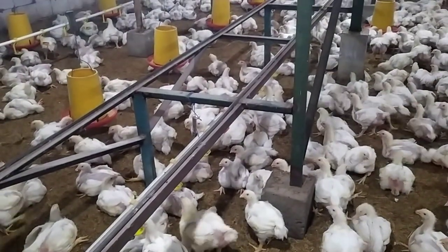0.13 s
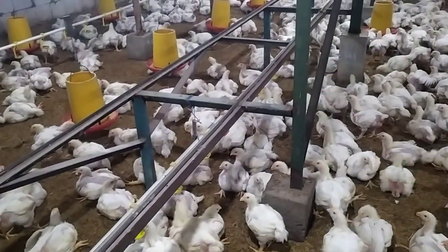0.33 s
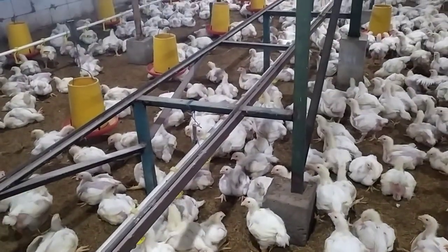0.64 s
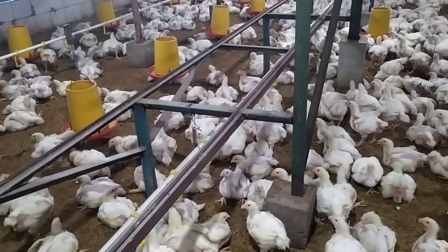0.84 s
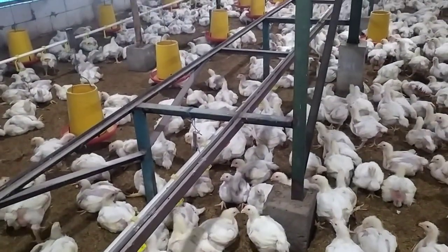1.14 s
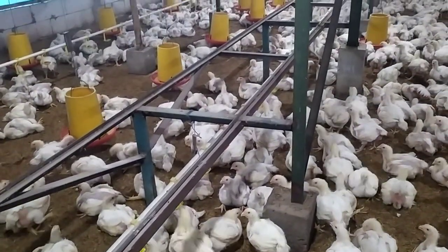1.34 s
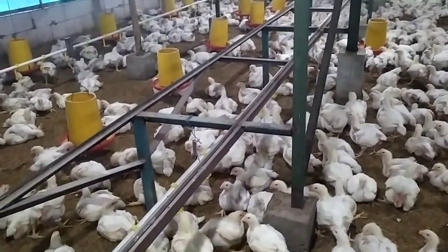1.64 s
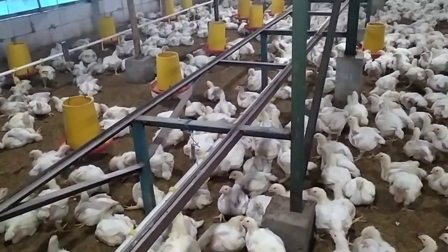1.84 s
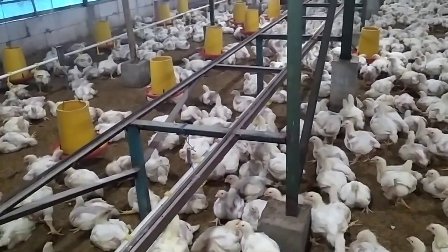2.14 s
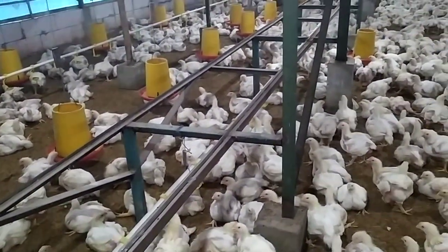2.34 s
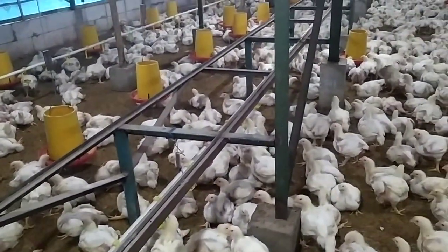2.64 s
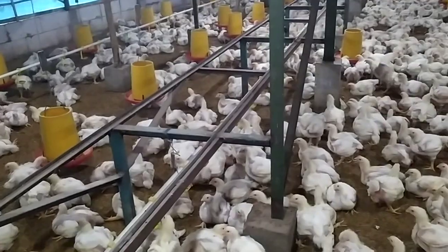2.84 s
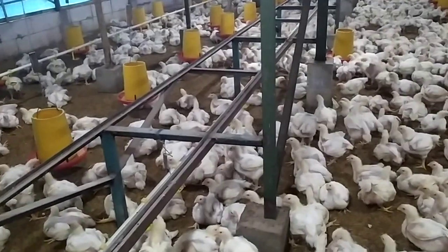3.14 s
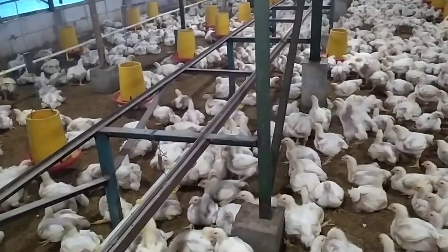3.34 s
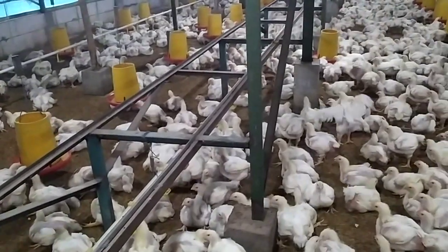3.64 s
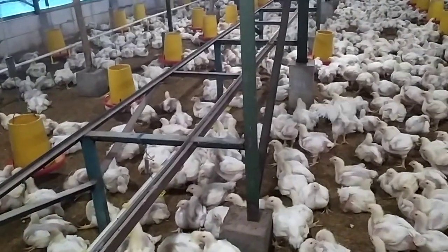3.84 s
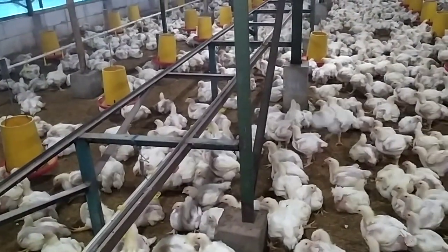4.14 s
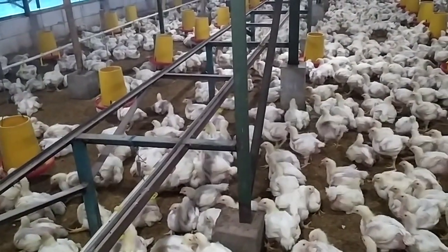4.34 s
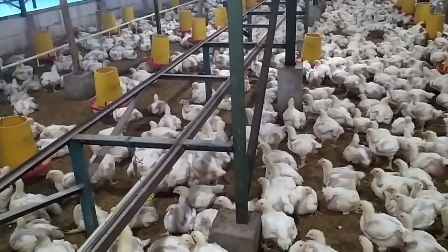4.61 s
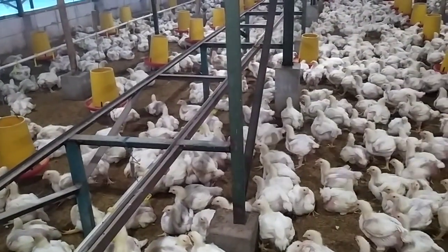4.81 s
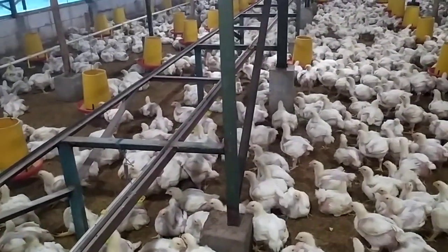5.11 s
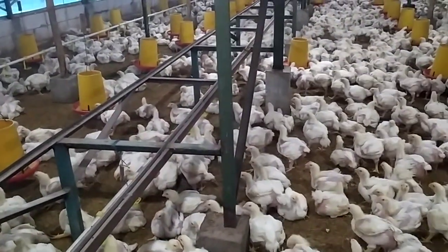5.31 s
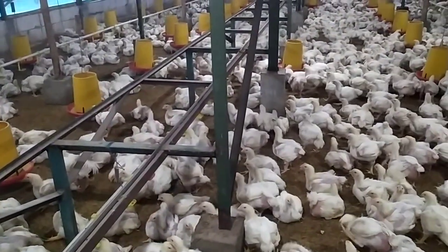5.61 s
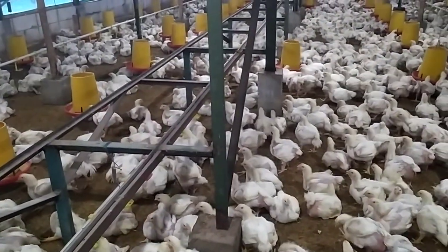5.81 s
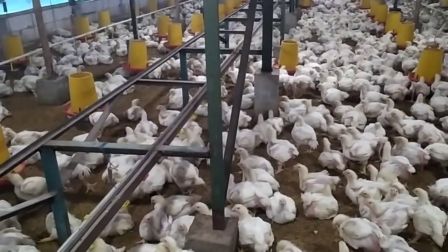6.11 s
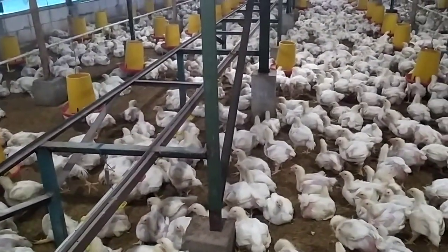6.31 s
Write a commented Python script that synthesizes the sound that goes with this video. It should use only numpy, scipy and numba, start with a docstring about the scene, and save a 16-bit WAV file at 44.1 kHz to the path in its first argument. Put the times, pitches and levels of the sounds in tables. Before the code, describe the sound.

Low fans hum steadily under a dense wash of peeping from hundreds of young chickens in a barn with a short echo. Closer to the microphone, single birds chirp in quick, sometimes raspy whistles and cluck hoarsely. Dry litter crackles all along, mixed with claw scratches, feather rustles, dull footfalls and scattered pecks. One short, strained squeal rises from the flock shortly before the end.

```python
"""A big flock of young broiler chickens in a closed barn, heard from above.
From the start, fans throb low and hundreds of syrinxes blur into a chorus over crackling litter.
Near birds peep in short, mostly falling whistles and cluck hoarsely through ringing throats; all along,
feet thud and scratch, feathers rustle and beaks tap. Near the end, at 5.7 s, one bird squeals."""
import sys
import numpy as np
from scipy import signal
from scipy.fft import rfft, irfft, next_fast_len
from scipy.io import wavfile
from scipy.ndimage import uniform_filter1d
from numba import njit

SR = 44100
rng = np.random.default_rng(int(sys.argv[2]) if len(sys.argv) > 2 else 0)


def transcribe(signal):
    """Save signal, clipped to [-1, 1], as a 16-bit WAV file at the path in sys.argv[1]."""
    frames = np.atleast_2d(signal).T
    limited = np.clip(frames, -1, 1)
    pcm = np.round(limited * 32767).astype(np.int16)
    wavfile.write(sys.argv[1], SR, pcm)


N = 284886
TIME = np.arange(N) / SR


def undb(db):
    """Decibels to gain."""
    return 10 ** (np.asarray(db) / 20)


def unit(x):
    """Scale to rms 1."""
    return x / np.sqrt(np.mean(x ** 2) + 1e-20)


def curve(rows):
    """An automation line through (t/s, value) breakpoints."""
    return np.interp(TIME, *np.transpose(rows))


def walk(rate, size=N):
    """Smooth random modulation with a spread near 1 that turns rate times a second."""
    hold = max(int(SR / rate), 2)
    held = np.repeat(rng.standard_normal(size // hold + 2), hold)
    return 1.26 * uniform_filter1d(uniform_filter1d(held, hold), hold)[:size]


def colour(x, points):
    """EQ a sound through (f/Hz, gain/dB) points, then scale to rms 1."""
    hz, db = np.transpose(points)
    size = next_fast_len(N + SR // 8, True)
    bins_hz = np.maximum(np.fft.rfftfreq(size, 1 / SR), 1)
    gain = undb(np.interp(np.log(bins_hz), np.log(hz), db))
    return unit(irfft(rfft(x, size) * gain, size)[..., :N])


def resonate(x, hz, width_hz):
    """A resonance with gentle skirts."""
    edges = np.clip([hz - width_hz / 2, hz + width_hz / 2], 30, SR / 2 - 100)
    return signal.lfilter(*signal.butter(2, edges, "band", fs=SR), x)


def stereo_noise(side_db, size=N):
    """Mid/side noise; side_db sets the width."""
    mid, side = rng.standard_normal((2, size))
    return unit(mid + undb(side_db) * side * np.array([[1], [-1]]))


def panned(pan_db):
    """Channel gains for a pan, which is always left minus right in dB."""
    return undb(np.array([[pan_db], [-pan_db]]) / 2)


def add(out, sound, s, pan_db=0):
    """Place a sound at time s; it reaches the louder side a little earlier."""
    lag = int(8 * np.tanh(pan_db / 3))
    for channel, side in enumerate((1, -1)):
        start = max(int(s * SR) - side * lag, 0)
        part = np.broadcast_to(sound, (2, sound.shape[-1]))[channel, :max(N - start, 0)]
        out[channel, start:start + len(part)] += part * undb(side * pan_db / 2)


def barn(x, early_db=4.5, early_s=0.014, t60_s=0.39, treble_t60_s=0.27):
    """Early reflections off floor and rails, then the tail of walls and roof; the treble dies first."""
    t = np.arange(SR // 2) / SR
    noise = rng.standard_normal((2, len(t)))
    low = signal.lfilter(*signal.butter(2, 3500, fs=SR), noise)
    tail = low * undb(-60 * t / t60_s) + (noise - low) * undb(-60 * t / treble_t60_s)
    response = tail * (1 + undb(early_db) * np.exp(-t / early_s)) * (t > .003)
    return signal.fftconvolve(x, unit(response) / np.sqrt(len(t)), axes=1)[:, :N]


def bounced(call, bounce_db=-4.5, decay_s=0.0083):
    """Short paths via floor, rails and feeders break a call up at each ear but keep its energy."""
    t = np.arange(SR // 30) / SR
    scatter = unit(rng.standard_normal((2, len(t))) * np.exp(-t / decay_s))
    paths = scatter * undb(bounce_db) / np.sqrt(len(t))
    paths[:, 0] = 1  # the direct path
    heard = signal.fftconvolve(call[None], paths, axes=1)
    return heard * np.sqrt(np.sum(call ** 2) / np.sum(heard ** 2, axis=1, keepdims=True))


def fan_tone(hz, drift_hz=0.715):
    """The hum of a fan or motor, wavering in pitch and slightly different at each ear."""
    phase = 2 * np.pi * (rng.random() + np.cumsum(hz + drift_hz * walk(7)) / SR)
    return np.sqrt(2) * np.sin(phase + 0.16 * walk(11) * np.array([[1], [-1]]))


def ventilation(fan_hz=84.63, flutter_db=0.6):
    """The low bed: a throbbing fan tone, weaker hums and the rumble of moving air."""
    # slow throb of the main fan tone: t/s, level/dB
    throb = [(0.0, -41), (0.07, -35.5), (0.7, -45), (0.77, -35), (1.2, -40), (1.58, -35.5), (1.71, -57),
             (1.96, -30.5), (2.19, -57), (2.28, -36), (2.59, -45), (2.91, -33), (3.18, -52.5), (3.27, -33),
             (3.54, -45.5), (3.89, -39), (4.08, -54.5), (4.77, -32.5), (4.82, -44), (5.29, -33),
             (5.34, -41), (5.76, -35), (6.1, -48.5), (6.46, -38.5)]
    # weaker fan and motor tones: f/Hz, level/dB
    hums = [(43, -57), (60.3, -52.5), (70.5, -56), (77.7, -48.5), (100.4, -52.5), (110.6, -46.5),
            (128, -56.5), (130.5, -51), (171, -63.5), (211, -63)]
    # spectrum of the moving air: f/Hz, gain/dB
    air_eq = [(22, -38), (36, -4), (52, 1.5), (85, 0), (125, -5.5), (150, -8), (205, -11.5), (250, -18),
              (300, -14), (390, -21), (480, -25.5), (700, -29.5), (1500, -37.5), (4000, -42)]
    main = fan_tone(fan_hz) * undb(curve(throb) + flutter_db * walk(14))
    others = sum(fan_tone(hz) * undb(db + 2 * walk(4.06)) for hz, db in hums)
    air = undb(-42.5) * colour(stereo_noise(-12.5) * undb(1.4 * walk(25)), air_eq)
    draught = undb(-52) * unit(resonate(rng.standard_normal((2, N)), 73.6, 53))  # separate at each ear
    return (main + others + air + draught) * panned(-0.37)


def whistle(length, start_hz, end_hz, rasp, overtone_db, rasp_hz=170.8, swing_rad=1.18, depth=0.61):
    """One note of the syrinx: the pitch glides fast, then levels off; uneven flutter makes it raspy."""
    size = int(max(length, .01) * SR)
    progress = np.arange(size) / size
    glide_hz = end_hz + (start_hz - end_hz) * (1 - progress) ** 1.39
    hz = glide_hz * (1 + .014 * walk(450, size))
    flutter_cycles = rng.random() + np.cumsum(rasp_hz * (1 + 0.34 * walk(255, size))) / SR
    flutter = rasp * np.sin(2 * np.pi * flutter_cycles)
    phase = 2 * np.pi * np.cumsum(hz) / SR + swing_rad * flutter
    swell = np.sin(np.pi * progress) ** 0.39 * undb(2.8 * walk(194, size)) * (1 + depth * flutter)
    return unit(swell * (np.sin(phase) + undb(overtone_db) * np.sin(2 * phase)))


def far_birds(count, pitch_hz, spread, scatter_db, longest_s, glide):
    """Many birds calling at random, each with its own pitch, fall, distance and direction."""
    out = np.zeros((2, N))
    calls = zip(rng.random((count, 4)), rng.standard_normal((count, 2)))
    for (when, long, fall, near), (voice, side) in calls:
        hz = pitch_hz * np.exp(spread * np.clip(voice, -2, 2))
        drop = 1 + glide * (0.31 + fall)
        note = whistle(longest_s * (.4 + .6 * long), hz * drop, hz / drop, rasp=.2, overtone_db=-24)
        add(out, undb(scatter_db * near) * note, when * N / SR, .5 + 2.9 * side)
    return unit(out)


def flock(restless_db=1.8, wash_db=-5.5, direct_db=-3, echo_db=-6.5):
    """Peeps, quick chips and lower notes from all over the floor; the farthest merge into a wash."""
    # fader of the chatter, steady but for a few short lulls: t/s, level/dB
    chatter = [(0, -50.5), (.93, -50), (1.04, -57), (1.2, -50), (2.45, -52), (2.54, -64), (2.62, -52),
               (3.95, -50.5), (4.03, -56.5), (4.12, -52.5), (4.78, -53.5), (4.87, -62), (4.97, -50.5),
               (6.27, -51), (6.36, -58.5), (6.42, -48.5)]
    # spectrum of the farthest voices: f/Hz, gain/dB
    chorus_eq = [(600, -4), (980, 4.5), (1250, -11), (1600, -2), (1950, -5), (2500, 7), (3000, 7.5),
                 (3700, -1.5), (6000, -18)]
    peeps = far_birds(count=720, pitch_hz=2261, spread=.15, scatter_db=.5, longest_s=.075, glide=.1213)
    chips = far_birds(count=180, pitch_hz=1850, spread=.188, scatter_db=3, longest_s=.0279, glide=.169)
    lows = far_birds(count=150, pitch_hz=1042, spread=.18, scatter_db=7, longest_s=.043, glide=.054)
    activity = undb(curve(chatter) + restless_db * walk(18))
    birds = activity * (peeps + undb(-9.5) * chips) + undb(-63) * lows
    wash = undb(curve(chatter) + wash_db) * colour(stereo_noise(0), chorus_eq)
    return undb(direct_db) * birds + undb(echo_db) * barn(birds) + wash


def shuffling(attack_s=0.0083, release_s=0.041):
    """Envelopes of husks and of feathers: each shuffle rises, holds and fades over the flock's stir."""
    # fader of the distant rustle: t/s, level/dB
    stir = [(0.0, -51.5), (0.12, -55), (2.19, -53.5), (2.39, -57), (3.76, -57), (4.01, -52.5), (5.63, -57),
            (6.46, -56.5)]
    # a near bird shuffles its feet and shakes its feathers: t/s, length/s, husks/dB, feathers/dB
    shuffles = [(0.115, 0.12, -51, -68), (0.353, 0.17, -51.5, -50.5), (0.552, 0.24, -50.5, -61),
                (1.014, 0.13, -54, -52), (1.207, 0.053, -51, -54), (1.328, 0.062, -49, -62),
                (1.424, 0.068, -51, -55), (1.53, 0.063, -49, -51), (1.61, .03, -48, -49),
                (1.67, 0.048, -52, -52), (1.835, 0.046, -57, -51), (1.937, 0.074, -60, -52),
                (2.067, 0.06, -53, -58), (2.175, .05, -48, -63), (2.222, .11, -48, -54),
                (2.417, 0.055, -57, -54), (2.563, 0.074, -51.5, -59), (2.732, 0.048, -56, -52),
                (2.92, 0.069, -50.5, -63), (2.985, 0.051, -53, -52), (3.144, 0.037, -51, -62),
                (3.288, 0.1, -55.5, -53), (3.424, 0.091, -53, -60), (3.61, 0.051, -60, -53.5),
                (3.75, 0.072, -48.5, -49), (3.87, 0.1, -52, -54), (4.12, 0.076, -52.5, -47.5),
                (4.295, 0.079, -51.5, -49), (4.5, 0.081, -64, -51), (4.746, 0.064, -48.5, -53),
                (4.86, .07, -51.5, -51), (5.056, 0.063, -57, -49.5), (5.166, 0.088, -50.5, -48),
                (5.465, 0.088, -56, -64), (5.714, 0.14, -48.5, -51)]
    husk_power = undb(curve(stir) + 2.5) ** 2
    feather_power = undb(curve(stir) - 5.5) ** 2
    for s, length, husks_db, feathers_db in shuffles:
        attack = np.clip((TIME - s) / attack_s, 0, 1)
        release = np.clip((s + length - TIME) / release_s + .5, 0, 1)
        husk_power += (undb(husks_db) * attack * release) ** 2
        feather_power += (undb(feathers_db) * attack * release) ** 2
    return np.sqrt(husk_power), np.sqrt(feather_power)


def snaps(count=260, decay_s=0.00062):
    """Single dry husks and quills snap underfoot: tiny ticks, a few of them much louder."""
    out, t = np.zeros((2, N)), np.arange(SR // 200) / SR
    for when, force, side in rng.random((count, 3)):
        tick = stereo_noise(0, len(t)) * np.exp(-t / decay_s)
        add(out, undb(18 * force) * tick, when * N / SR, 8 * (side - .5))
    return unit(resonate(out, 10800, 13000))


def litter(flicker_db=0.72, patchy_db=3.5):
    """Dry husks rustle in ever-shifting colours and feathers hiss; snaps ride on both."""
    # spectrum of the husks: f/Hz, gain/dB
    husk_eq = [(300, -2.5), (900, -4), (2500, 1), (4200, -4), (5600, 0), (8500, -1.5), (10500, -7),
               (12000, -6.5), (15500, -10)]
    # spectrum of the feathers: f/Hz, gain/dB
    feather_eq = [(5000, -12), (8500, -3.5), (10500, -2), (13000, -5), (15500, -6.5)]
    flicker = undb(flicker_db * walk(70))
    rustle = stereo_noise(1) * flicker
    edges_hz = np.linspace(150, 16500, num=15)
    bands = np.zeros((2, N))
    for k, (low, high) in enumerate(zip(edges_hz, edges_hz[1:])):
        band = resonate(rustle, (low + high) / 2, high - low)
        bands += band * undb(patchy_db * walk(55)) * (-1) ** k  # flipped so neighbours do not cancel
    husk_gain, feather_gain = shuffling()
    husks = colour(bands, husk_eq) * husk_gain * panned(4)
    feathers = colour(stereo_noise(1) * flicker, feather_eq) * feather_gain * panned(-2)
    return undb(-0.37) * (husks + feathers) + undb(-10) * snaps() * np.hypot(husk_gain, feather_gain)


def steps(decay_s=0.014, rise_s=0.00063):
    """Heavy birds land and bump on the packed floor: dull, short thuds."""
    # soft footfalls and bumps: t/s, peak/dB, boom/Hz
    footfalls = [(0.011, -42.5, 340), (.172, -44, 367), (.235, -43, 373), (.66, -40.5, 330),
                 (0.75, -42, 260), (0.831, -38, 285), (1.58, -44, 304), (2.311, -43, 220),
                 (2.651, -39, 318), (2.713, -41.5, 352), (3.432, -46, 343), (4.092, -39.5, 315),
                 (4.347, -42.5, 288), (5.056, -43, 300), (5.54, -41.5, 310), (6.129, -43, 402)]
    out, t = np.zeros((2, N)), np.arange(SR // 8) / SR
    envelope = np.exp(-t / decay_s) * (1 - np.exp(-t / rise_s))
    for s, db, hz in footfalls:
        thud = resonate(stereo_noise(-14, len(t)), hz, 0.37 * hz) * envelope
        add(out, undb(db) * thud / np.abs(thud).max(), s)
    return out


def scratches(decay_s=0.0087, rise_s=0.0021, husk_hz=7500):
    """A claw flicks through the litter: a brief gritty burst in which one husk rings."""
    # claw strokes: t/s, level/dB, pan/dB
    flicks = [(0.214, -37, 1.5), (0.38, -38, -2), (0.5622, -34.5, -1.5), (1.018, -45, 6), (1.234, -41, 1),
              (1.247, -37.5, -1.5), (1.268, -31.5, 1.5), (1.286, -41, 0.5), (1.8404, -44, 0.5),
              (1.942, -39, 2), (2.579, -42, 10), (2.77, -44, 3), (2.945, -45, 11), (3.335, -37.5, 3.5),
              (3.7944, -38, 6), (4.1275, -46, 4), (4.189, -38, 4.5), (4.4705, -34.5, 3.5),
              (4.8784, -36, -1.5), (5.178, -57, 3), (5.206, -47, 5), (5.8, -38.5, 1), (5.997, -43, -5.5)]
    out, t = np.zeros((2, N)), np.arange(SR // 16) / SR
    envelope = np.exp(-t / decay_s) * (1 - np.exp(-t / rise_s))
    for s, db, pan_db in flicks:
        grit = stereo_noise(0, len(t)) * undb(1.6 * walk(1500, len(t)))
        husk = unit(resonate(grit, husk_hz * rng.uniform(0.75, 1.38), 1500))
        scrape = unit(resonate(resonate(grit, 9100, 9600), 9100, 9600))
        add(out, undb(db) * (scrape + undb(-11.5) * husk) * envelope, s, pan_db)
    return out


def beak_taps(knock_hz=960, click_hz=3170, decay_s=0.0096):
    """Beak blows: a dull knock and a click, both quickly damped."""
    # pecks at feeders and floor: t/s, knock/dB, click/dB
    pecks = [(.565, -44, -42), (.875, -44, -45), (2.181, -59, -36), (2.649, -40, -42.5), (3.027, -48, -60),
             (4.087, -42.5, -39.5), (4.413, -45.5, -44), (5.055, -44, -60), (5.378, -51, -47),
             (5.53, -46, -44.5), (6.126, -44.5, -55), (6.164, -58, -49)]
    out, t = np.zeros((2, N)), np.arange(SR // 12) / SR
    for s, knock_db, click_db in pecks:
        blow = stereo_noise(-1.6, len(t))
        knock = undb(knock_db) * unit(resonate(blow, knock_hz, 700))
        click = undb(click_db) * unit(resonate(blow, click_hz, 2100))
        add(out, (knock + click) * np.exp(-t / decay_s), s)
    return out


@njit
def throat(x, hz, width_hz):
    """A swept band-pass: the resonance moves as the beak opens and closes."""
    out, band_state, low_state = np.empty(len(x)), 0., 0.
    for i in range(len(x)):
        tuning, damping = np.tan(np.pi * hz[i] / SR), width_hz / hz[i]
        band = (band_state + tuning * (x[i] - low_state)) / (1 + tuning * (tuning + damping))
        band_state = 2 * band - band_state
        low_state += 2 * tuning * band
        out[i] = damping * band
    return out


def clucks(voice_hz=420, jitter=.07, breathy=0.032, fall=.14):
    """Uneven pulses of the syrinx, sinking in pitch, ring a throat whose resonance slides."""
    # hoarse calls: t/s, length/s, resonance start/Hz, resonance end/Hz, base width/Hz, level/dB
    calls = [(0.026, .032, 2100, 1850, 890, -46.5), (0.081, 0.058, 2120, 1850, 500, -53.5),
             (0.175, 0.037, 1690, 1890, 1500, -44), (0.182, 0.048, 4000, 4270, 700, -51),
             (0.206, .045, 2120, 2290, 1000, -50), (0.733, 0.073, 2960, 2820, 600, -50.5),
             (0.794, .05, 1360, 1100, 600, -54), (.9, 0.042, 2310, 2150, 800, -50),
             (1.168, .05, 3650, 3370, 696, -50.5), (1.197, 0.084, 1310, 1140, 500, -54.5),
             (1.198, .09, 2280, 1950, 700, -54), (1.528, 0.042, 2630, 3100, 600, -47),
             (1.552, 0.035, 1690, 1390, 900, -46), (1.971, 0.048, 1430, 1280, 700, -54),
             (2.409, 0.033, 1820, 1620, 500, -41.5), (2.415, 0.028, 2300, 2400, 400, -48),
             (2.406, 0.038, 970, 930, 150, -48.5), (2.838, .02, 1400, 1280, 500, -54),
             (3.31, 0.025, 1700, 1400, 800, -49), (3.736, 0.052, 2700, 2450, 1000, -53.5),
             (4.217, 0.023, 1200, 1100, 300, -50.5), (4.329, .019, 2200, 1950, 700, -44),
             (4.432, 0.024, 1850, 2470, 600, -46.5), (4.448, 0.029, 2200, 1450, 700, -46),
             (4.546, 0.038, 1830, 1430, 500, -48.5), (4.595, 0.05, 1260, 1130, 330, -51),
             (4.77, 0.023, 2450, 1700, 600, -49), (4.941, 0.019, 2250, 1450, 800, -46),
             (5.035, 0.046, 2350, 1500, 1000, -52), (5.338, 0.081, 2050, 1500, 900, -49.5),
             (5.348, 0.031, 3950, 3600, 500, -54.5), (5.885, 0.053, 1650, 2300, 700, -49)]
    out = np.zeros((2, N))
    birds = rng.standard_normal((len(calls), 2))
    for (s, length, start_hz, end_hz, width_hz, db), (voice, side) in zip(calls, birds):
        size = int(length * SR)
        progress = np.arange(size) / size
        pitch_hz = voice_hz * (1 - fall * progress) * (1 + .1 * voice + jitter * walk(600, size))
        cycles = np.cumsum(pitch_hz) / SR
        pulses = np.diff(np.floor(cycles), prepend=0) * undb(2 * walk(310, size))
        source = pulses + breathy * rng.standard_normal(size)
        formant_hz = start_hz + (end_hz - start_hz) * progress
        stage_width_hz = 1.35 * width_hz  # wider, as two passes narrow the band
        voiced = throat(throat(source, formant_hz, stage_width_hz), formant_hz, stage_width_hz)
        call = unit(voiced * np.sin(np.pi * progress) ** 0.59)
        add(out, undb(db) * bounced(call), s, 0.27 + 1.8 * side)
    return out


def squeal():
    """A strained cry that arches in pitch; the syrinx shakes and the throat favours the even partials."""
    # contour of the cry: t/s, f/Hz, level/dB
    contour = [(5.714, 1900, -56), (5.729, 1946, -42), (5.752, 1940, -39.5), (5.778, 1914, -39.5),
               (5.80, 1930, -43), (5.825, 1900, -56)]
    # its partials: multiple of the pitch, relative level/dB
    partials = [(1, -5), (2, -2), (3, -16), (4, -6)]
    out = np.zeros((2, N))
    s, hz, db = np.transpose(contour)
    t = np.arange(s[0], s[-1], 1 / SR)
    shake = 1 + .022 * walk(700, len(t))
    phase = 2 * np.pi * np.cumsum(np.interp(t, s, hz) * shake) / SR
    cry = sum(undb(part_db + 2.5 * walk(275, len(t))) * np.sin(k * phase) for k, part_db in partials)
    add(out, bounced(unit(cry) * undb(np.interp(t, s, db))), s[0], pan_db=1)
    return out


def near_peeps(trim_db=0.05):
    """The lead voices: birds close by whistle short peeps, clear or hoarse."""
    # peeps: t/s, length/s, start f/Hz, end f/Hz, level/dB, pan/dB, rasp (0-1)
    peeps = [(.031, 0.052, 2500, 1916, -49, 2.5, .3), (0.062, 0.055, 1497, 1460, -48, -3.5, 0.7),
             (0.119, 0.042, 1792, 1356, -48.5, 3, 0.6), (0.158, 0.063, 2420, 1950, -49, 3.5, 0.6),
             (0.202, 0.062, 2580, 2124, -51, -1, 0.6), (.294, 0.057, 2500, 1920, -52.5, 2, .1),
             (0.35, .035, 3400, 2980, -55, 1.5, .2), (0.435, 0.049, 2750, 2280, -59, -1, 0.3),
             (0.521, 0.055, 1556, 1514, -52.5, 1, 0.5), (0.596, 0.034, 2350, 2300, -48, 4.5, .3),
             (0.614, 0.05, 1885, 1600, -50, -2, 0.9), (0.705, 0.033, 3110, 2800, -57, 6, .5),
             (0.755, 0.054, 2350, 1793, -45.5, 0.5, 0.6), (0.9, 0.05, 2296, 2040, -45.5, 3.5, 0.8),
             (0.907, 0.024, 1510, 1430, -47, 2.5, .2), (0.946, 0.048, 1980, 1660, -46.5, 1, 0.15),
             (0.999, 0.015, 1050, 980, -56, 4, 0.4), (1.02, 0.014, 1480, 1210, -50, 2, .3),
             (1.083, 0.037, 3270, 2690, -54.5, 5, .3), (1.186, 0.035, 2197, 2050, -39.5, 3.5, 1),
             (1.223, 0.07, 1950, 1728, -44.5, 1.5, 0.6), (1.311, 0.04, 2420, 1896, -50.5, 1, 0.1),
             (1.36, 0.057, 2450, 1965, -50, 4, 0.4), (1.474, 0.032, 1776, 1740, -48, 11, 0.2),
             (1.568, 0.056, 1885, 2140, -52, 4.5, 0.1), (1.753, 0.031, 2980, 2880, -51.5, 3, 0.5),
             (1.771, 0.046, 2340, 1860, -49, 2.5, .1), (1.846, 0.044, 1973, 1870, -50.5, 7, 0),
             (1.937, 0.058, 2700, 2330, -52.5, 1, .2), (1.989, 0.048, 3400, 2460, -51, 4, 0.2),
             (2.041, 0.034, 3400, 2940, -54, 3.5, .1), (2.093, 0.041, 2790, 2430, -48, 4.5, 1),
             (2.279, 0.08, 2870, 2250, -52.5, 0, 0.5), (2.308, 0.029, 1790, 1720, -52.5, 2, .2),
             (2.375, 0.041, 2650, 2400, -54, 3, 0.3), (2.376, 0.034, 1940, 1826, -48.5, 9, 0.2),
             (2.443, 0.062, 2024, 1807, -46.5, 2, 0.1), (2.7, 0.046, 2110, 1890, -54, 1, 0.3),
             (2.7, 0.025, 1140, 1120, -56, 8, 0.3), (2.838, 0.061, 2114, 1803, -46, -3.5, 0.5),
             (2.853, 0.036, 3900, 3420, -55, 2, .2), (2.907, 0.042, 2520, 2090, -50, -1.5, 0.2),
             (2.985, 0.031, 2150, 2040, -49, 4, 0.1), (3.026, 0.062, 3330, 2640, -48, 4, 0.3),
             (3.065, 0.025, 1860, 1326, -49, 1.5, 0.5), (3.126, 0.03, 2660, 2480, -50, 2.5, 0.4),
             (3.132, 0.014, 1500, 1350, -53, 2, 0.1), (3.175, 0.032, 4050, 3730, -56, 1.5, .3),
             (3.214, 0.038, 1247, 1135, -51.5, 6, 0.4), (3.27, 0.022, 3760, 3580, -55, 1.5, .2),
             (3.324, 0.044, 2140, 1850, -46, 11, 0.1), (3.405, 0.06, 1880, 1787, -44.5, 3.5, 0.6),
             (3.464, .048, 2580, 2130, -52, 6, 0.9), (3.53, .025, 1220, 1140, -52.5, 3, 0.4),
             (3.54, 0.037, 2480, 2150, -57, 3, .2), (3.595, 0.081, 2210, 1760, -50, 1.5, 0.3),
             (3.641, 0.047, 997, 910, -56.5, 1.5, .1), (3.645, 0.037, 2113, 1864, -47.5, 1.5, 0.4),
             (3.666, 0.048, 2670, 2160, -52, 2.5, 0.3), (3.813, 0.038, 2770, 2095, -50.5, 1, 0.2),
             (3.839, 0.022, 2910, 2615, -49, 3.5, .2), (3.897, 0.031, 1010, 905, -52, -4, .1),
             (3.91, 0.035, 2400, 1920, -49.5, -0.5, 0.6), (3.941, 0.02, 2810, 2415, -46, .5, 0.3),
             (4.108, 0.046, 2354, 2055, -46.5, 1.5, 0.3), (4.224, 0.047, 2680, 2020, -47.5, 4, 0),
             (4.243, 0.043, 1933, 1888, -49, -2.5, 0), (4.312, 0.027, 2440, 2210, -48, 0, 0.5),
             (4.488, 0.025, 2215, 2120, -50, 1.5, .2), (4.612, 0.033, 1406, 1130, -55, 5, 0.6),
             (4.613, 0.042, 3450, 3100, -54, 2, .3), (4.646, 0.03, 2250, 2030, -50, 3, .2),
             (4.736, 0.038, 2680, 2330, -51, -1, 0.4), (4.775, 0.03, 1910, 1160, -39.5, 2.5, 0.34),
             (4.81, 0.032, 2110, 2060, -54.5, 0.5, 0.2), (4.96, 0.033, 2160, 1950, -61, -3, 0.1),
             (4.999, 0.055, 1545, 1504, -58, 1, 0), (5.085, 0.058, 1960, 1790, -50.5, 13, 0),
             (5.128, 0.068, 3350, 2570, -55, 3, .2), (5.16, 0.027, 2520, 2286, -49, -0.5, .3),
             (5.207, 0.024, 2530, 2350, -52, 5, 0.1), (5.25, 0.061, 2790, 2290, -56.5, 4, 0.4),
             (5.314, 0.051, 2160, 1966, -48, 7, .4), (5.561, 0.026, 2880, 2490, -50, 4.5, 0.1),
             (5.576, 0.038, 2165, 1780, -52, 1, 0.6), (5.606, 0.027, 1047, 930, -55, 1, .2),
             (5.702, 0.062, 2980, 2430, -48, 2, 0.9), (5.884, .025, 1124, 1030, -53, 2.5, 0.6),
             (5.897, 0.052, 2170, 1934, -50, 7, 0.3), (5.971, 0.038, 1180, 1070, -57, 2, 0.5),
             (5.976, 0.055, 3050, 2445, -56, 2.5, 0.1), (5.983, 0.045, 1880, 1725, -52, 5, .1),
             (6.223, 0.017, 2260, 1900, -46, -0.5, 0), (6.227, 0.06, 3100, 2620, -54, 3.5, 0.5),
             (6.277, 0.038, 2420, 2070, -51, 2.5, 0.4), (6.392, 0.027, 3480, 3370, -57, 2.5, .1),
             (6.408, 0.037, 2194, 1930, -47.5, 0.5, 0.1)]
    out = np.zeros((2, N))
    for s, length, start_hz, end_hz, db, pan_db, rasp in peeps:
        note = whistle(length, start_hz, end_hz, rasp, overtone_db=-23)
        add(out, undb(db + trim_db) * bounced(note), s, pan_db)
    return out


def scene():
    """Near sounds with their echo, over the flock, the litter and the fans."""
    voices = near_peeps() + squeal() + clucks()
    contacts = beak_taps() + scratches() + steps()
    # taps, scratches and thuds echo through the barn a little more than the voices
    send = undb(-10) * voices + undb(-7) * contacts
    return voices + contacts + barn(send, early_db=0) + flock() + litter() + ventilation()


def record(dry, low_cut_hz=37, high_cut_hz=15850):
    """Steep filters cut the deepest bass and the top."""
    dry = signal.sosfilt(signal.butter(8, low_cut_hz, "high", fs=SR, output="sos"), dry)
    return signal.sosfilt(signal.ellip(10, .2, 80, high_cut_hz, fs=SR, output="sos"), dry)


dry = scene()
out = record(dry)
transcribe(out)
```